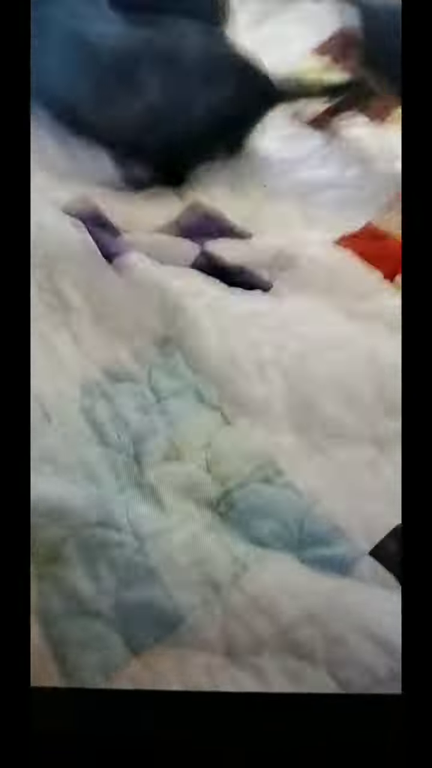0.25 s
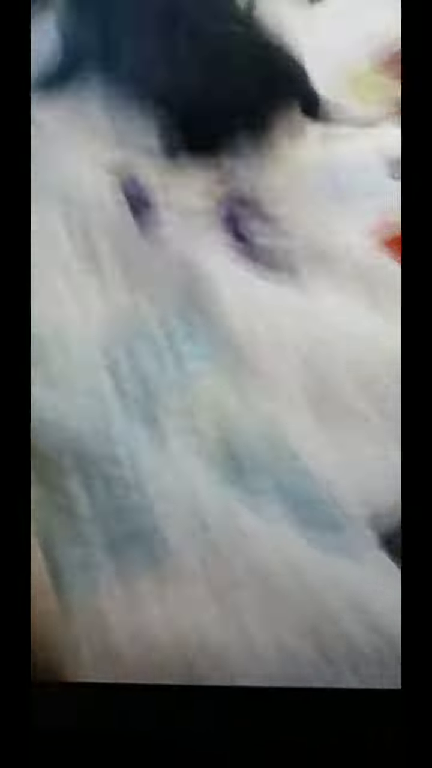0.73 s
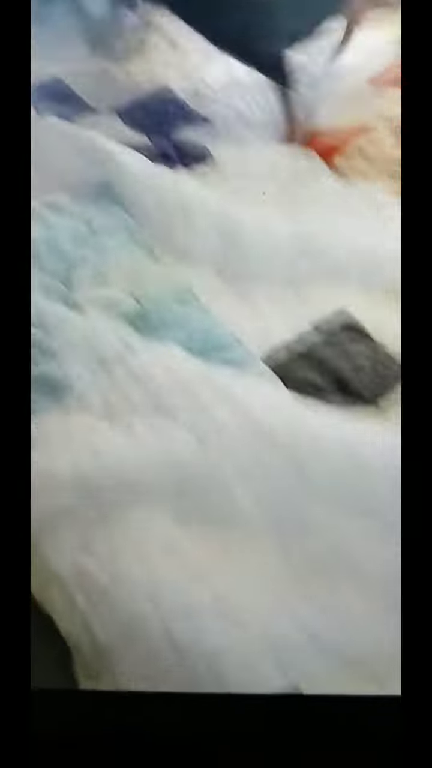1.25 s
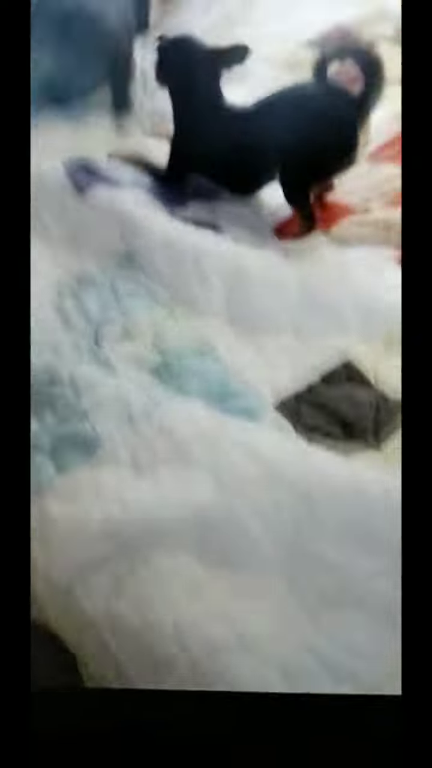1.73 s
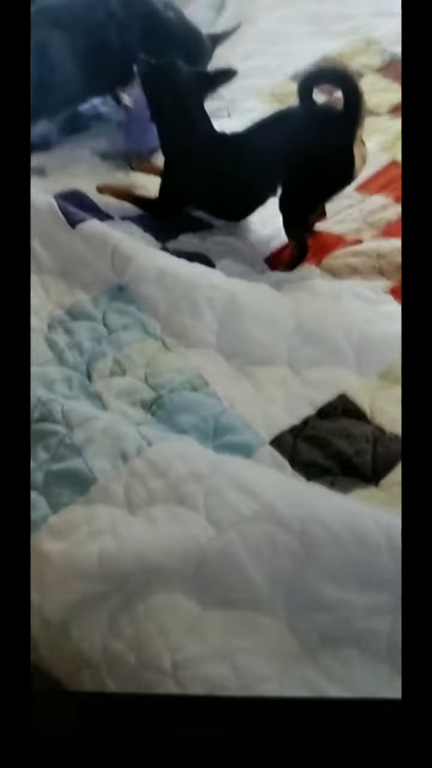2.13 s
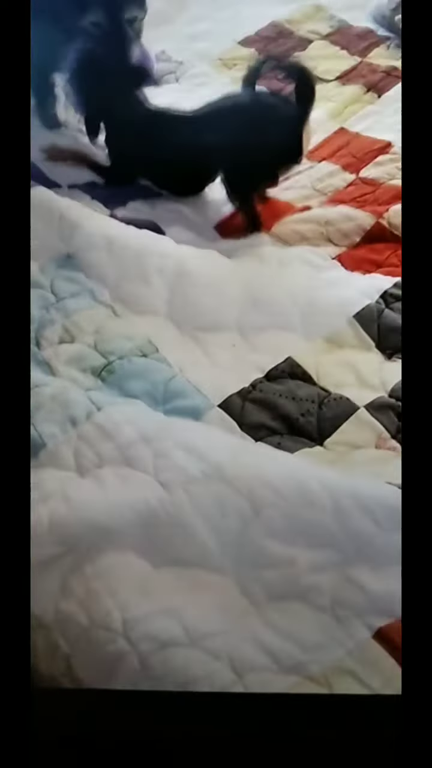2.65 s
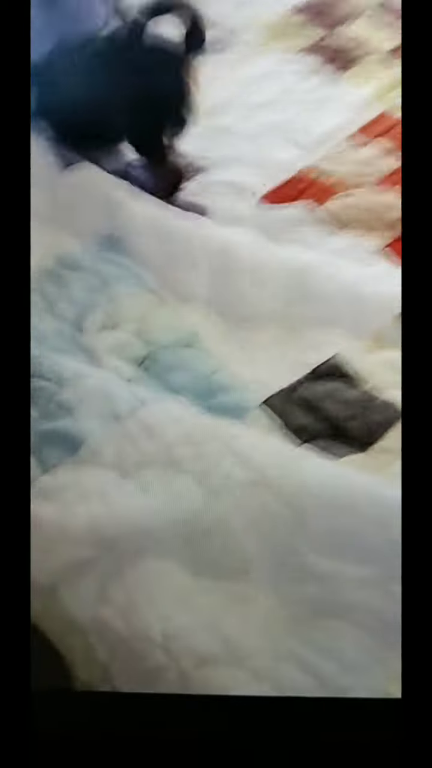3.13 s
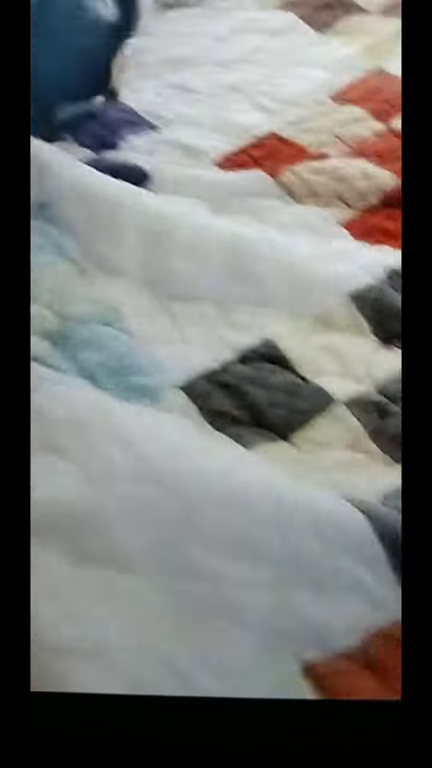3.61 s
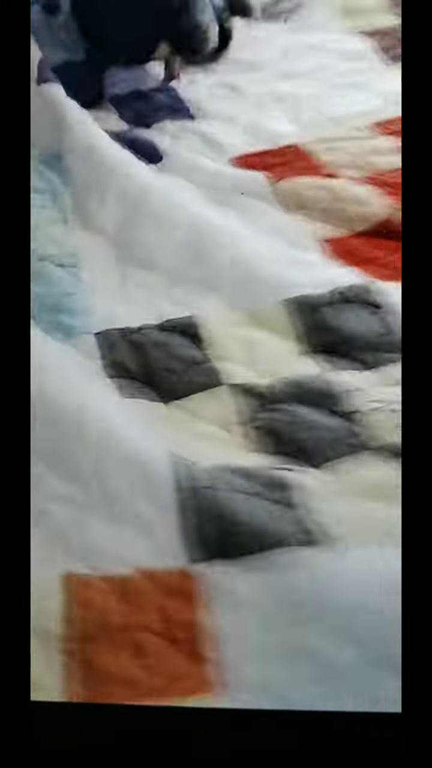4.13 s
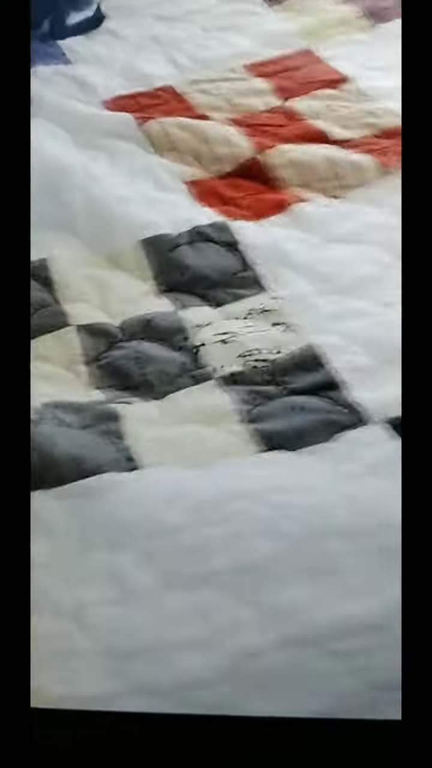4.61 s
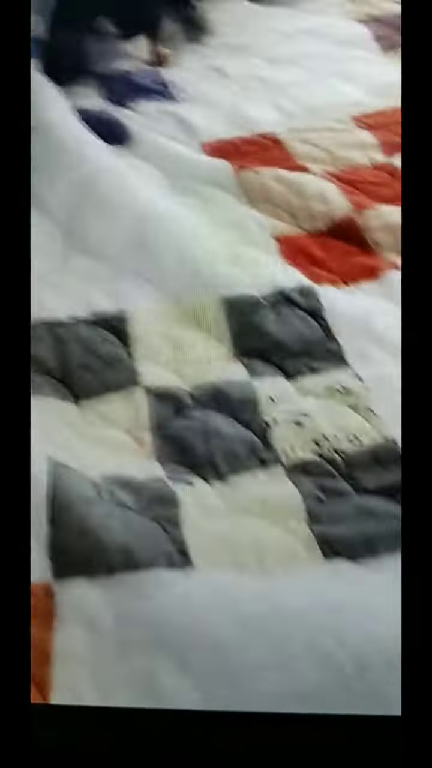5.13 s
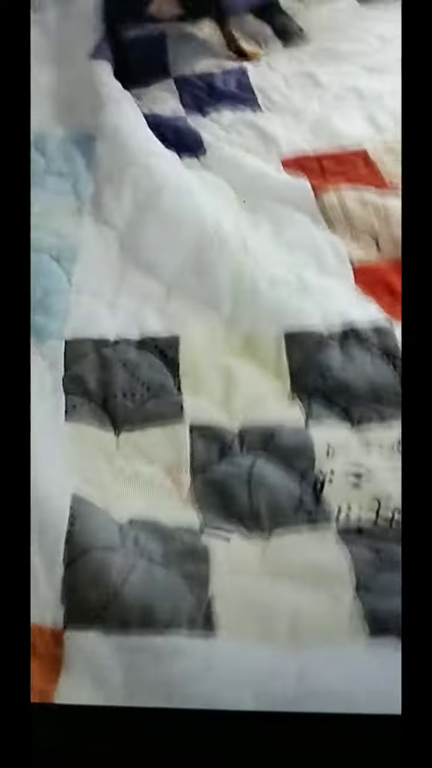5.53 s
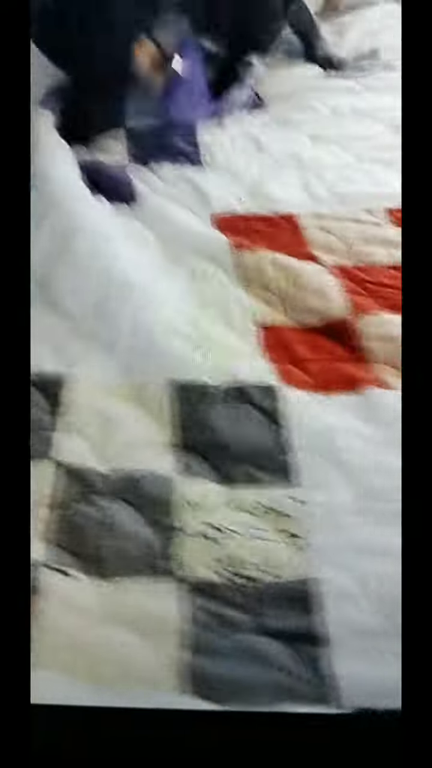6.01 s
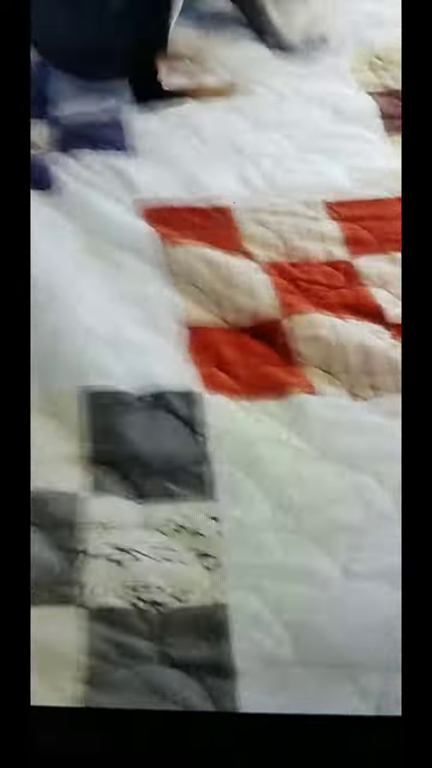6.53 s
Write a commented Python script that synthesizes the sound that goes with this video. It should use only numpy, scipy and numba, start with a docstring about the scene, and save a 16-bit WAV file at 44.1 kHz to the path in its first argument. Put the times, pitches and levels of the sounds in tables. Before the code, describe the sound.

Close, thin, small-speaker sound of wrestling puppies: gravelly, uneven growls and breathy snorts, strongest just after the first second. Very short, high, falling toy squeaks repeat irregularly from about one and a half to five and a half seconds. Three bright yaps burst out around the middle, with whining and a low moan after. It drops to a faint hush, then a softer growl returns. Soft indoor room, gated tails.

```python
"""Growling puppies wrestle on a bed: uneven vocal-fold pulses and puffing air excite body resonances.
They also yap three times, whine and moan (wavering harmonic series), and their teeth click.
They bite a squeaky toy again and again: a pop, then a rattling reed whose pitch sags.
All this comes through a small loudspeaker in a soft room and reaches two microphone ports by unequal
paths; a noise gate shortens the tails, and a faint background lies underneath."""
import sys
import numpy as np
from scipy import signal
from scipy.fft import rfft, irfft, next_fast_len
from scipy.io import wavfile
from scipy.ndimage import uniform_filter1d
from numba import njit

SR = 44100
rng = np.random.default_rng(int(sys.argv[2]) if len(sys.argv) > 2 else 0)


def transcribe(signal):
    """Save signal, clipped to [-1, 1], as a 16-bit WAV file at the path in sys.argv[1]."""
    frames = np.atleast_2d(signal).T
    limited = np.clip(frames, -1, 1)
    pcm = np.round(limited * 32767).astype(np.int16)
    wavfile.write(sys.argv[1], SR, pcm)


N = 298116

# yaps, nearly clean fold vibration: pitch_spread (relative), cycle_alternation (0-1),
# [(time_s, pitch_hz, fundamental_db, overtones_db, strongest_overtone_hz)]
YAP_CALLS = [(.004, 0.23, [(3.695, 814, -28.5, -51, 2200), (3.706, 925.6, -23.5, -39, 2200),
             (3.727, 1063, -13.5, -35, 2300), (3.745, 1071, -15, -23.5, 2400),
             (3.76, 1111, -22.5, -20.5, 3000), (3.782, 1150, -15.5, -25, 3500),
             (3.796, 1128, -25, -22.5, 3500), (3.806, 1031, -44, -22, 2900),
             (3.826, 973, -25.5, -28.5, 2300), (3.842, 963.4, -26, -34.5, 2100),
             (3.865, 1088, -20, -42, 2300), (3.89, 1049, -39, -44, 2200), (3.93, 1124, -25, -42, 3000)]),
             (0.0081, 0.15, [(4.345, 959, -50.5, -63, 2600), (4.362, 1011, -27, -53, 2400),
             (4.378, 1081, -15, -33.5, 2600), (4.39, 1114, -13.5, -24, 3300),
             (4.42, 1084, -21.5, -30.5, 3400), (4.44, 1104, -41.5, -49.5, 3600),
             (4.495, 1055, -33, -27.5, 3200)]), (0.0043, 0.26, [(4.505, 906, -48.5, -27.5, 1800),
             (4.55, 893.5, -36, -34.5, 1800), (4.59, 899.4, -30, -37.5, 1850),
             (4.612, 924, -32.5, -28.5, 2100), (4.624, 961, -12.5, -21, 2300),
             (4.65, 985.5, -27.5, -28, 2164), (4.67, 942, -25, -28.5, 2095),
             (4.686, 885, -29.5, -42.5, 1850), (4.71, 873.7, -24, -46.5, 1800),
             (4.742, 972, -25.5, -36.5, 1850), (4.79, 971, -27, -48, 1850), (4.83, 883, -48, -70.5, 1850)])]


def growl(throat_width_hz, direct_rasp_db, yap_duck_db):
    """Source and filter: fold pulses and pulsed air drive parallel resonances of chest, throat and mouth."""
    # phrases: chest_db (while the throat is at middling_db), [(time_s, throat_db)]
    growl_phrases = [ (-64.5, [(0.264, -50), (0.272, -64), (0.468, -65), (0.482, -55)]),
                     (-54, [(0.484, -38), (0.524, -37), (0.68, -53)]), (-60, [(0.7, -88), (0.85, -63)]),
                     (-65.5, [(0.96, -51.5), (0.98, -34.5), (1.19, -32), (1.21, -28.5), (1.274, -24.5),
                     (1.53, -36.5), (1.62, -111)]), (-63.5, [(1.63, -46), (1.676, -33.5), (1.774, -33),
                     (1.986, -47.5), (2.036, -99.5)]), (-54.5, [(2.335, -84.5), (2.359, -45.5),
                     (2.627, -51), (3.15, -44.5), (3.163, -36.5), (3.261, -48.5), (3.289, -34),
                     (3.345, -48.5), (3.42, -79.5)]), (-73, [(3.43, -49), (3.696, -42), (3.732, -18),
                     (3.8, -61), (3.828, -19.5), (3.864, -26), (3.894, -48), (4.036, -73)]),
                     (-66.5, [(4.345, -61.5), (4.361, -8), (4.383, -12), (4.479, -43), (4.623, -10),
                     (4.673, -40), (4.825, -40), (5.319, -57.5), (5.42, -100)]), (-59, [(6.06, -99),
                     (6.096, -57.5), (6.148, -38), (6.496, -63), (6.52, -55.5), (6.76, -49.5)]), ]
    # air through open jaws: mouth_db (against the breath), [(time_s, breath_db)]
    pant_phrases = [ (-16.5, [(0.06, -69.5), (0.12, -50.5), (0.26, -68)]), (-4, [(0.262, -58), (0.366, -43),
                    (0.468, -57), (0.514, -48), (0.95, -55.5), (0.98, -45.5), (1.03, -41.5), (1.158, -44.5),
                    (1.284, -29), (1.525, -39.5)]), (-16, [(1.63, -33.5), (1.88, -32.5), (1.95, -50)]),
                    (-12, [(2.52, -54.5), (2.66, -64), (2.672, -55.5), (2.72, -57), (2.888, -58.5),
                    (2.95, -49.5)]), (-7, [(2.99, -63), (3.13, -47.5), (3.17, -45.5), (3.304, -42),
                    (3.484, -70.5), (3.545, -50.5)]), (4.5, [(3.63, -58), (3.705, -39.5), (3.725, -27),
                    (3.746, -32), (3.798, -47), (3.94, -57.5)]), (9.5, [(4.05, -63.5), (4.156, -87),
                    (4.18, -80)]), (2, [(4.345, -44), (4.391, -31), (4.6, -45.5), (4.622, -30.5),
                    (4.88, -68)]), (-20.5, [(5.03, -50.5), (5.12, -71.5)]), (-9, [(6.04, -88.5),
                    (6.08, -43.5), (6.166, -37.5), (6.256, -54), (6.294, -43.5), (6.45, -53.5),
                    (6.76, -46)]), ]
    # colour of the rasp: time_s, mouth_relative_db, lips_relative_db
    rasp_colour = [(.1, 6.5, 19.5), (.4, 1.5, 0), (.95, 1, 2), (1.02, 7, 0), (1.1, 2.5, 10),
                   (1.19, 3, -5.5), (1.3, -9, -2), (1.45, -6.5, -14.5), (1.68, -8.5, 4), (1.85, 4, 8.5),
                   (2.6, -7, -23.5), (2.8, 10.5, 13), (3.2, 0.5, -4.5), (3.4, 1, 1), (3.75, 1.5, -1),
                   (3.9, 7, 9.5), (4.4, -2.5, -7), (4.55, -5.5, -5), (4.7, -6, -14), (5.1, 16.5, 6),
                   (6.15, 0.5, -0.5), (6.4, 8, 9.5), (6.76, 6, 2.5)]
    # spectral envelopes: frequency_hz, relative_db
    chest_spectrum = [(60, -48), (120, -12), (245, -12.5), (380, -7.5), (550, -6.5), (700, 5.5), (900, -42)]
    throat_spectrum = [(400, -49.5), (650, -11), (900, 2), (1200, -5), (1500, -12), (1900, -40)]
    # resonances of mouth, lips (upper rasp) and breath: centre_hz, width_hz, relative_db
    mouth_modes = [(1910, 560, -6), (2810, 470, -3), (2857, 502, -2.5)]
    lip_modes = [(4500, 570, -7), (5255, 380, -1), (6300, 1000, -12.5)]
    breath_modes = [(7415, 910, -1.5), (8850, 1100, -0.5), (9640, 3000, -5), (11390, 350, -4.5),
                    (12180, 500, 2), (14500, 1500, -0.5)]

    middling_db = -45
    chest_follows, mouth_follows = 0.81, 0.44   # dB gained for each dB of the throat
    throat_gain, chest_gain = phrases([
        [(s, db, chest_db + chest_follows * (db - middling_db)) for s, db in rows]
        for chest_db, rows in growl_phrases])
    mouth_gain, breath_gain = phrases([
        [(s, db + mouth_db, db) for s, db in rows] for mouth_db, rows in pant_phrases])
    mouth_gain = mouth_gain * (throat_gain / from_db(middling_db) + 0.32) ** mouth_follows

    # the rasp gives way while the folds sing a yap
    ducking = yap_ducking(yap_duck_db)
    throat_gain, chest_gain = throat_gain * ducking, chest_gain * ducking
    mouth_gain = mouth_gain * ducking ** .55

    source, breath_air, throat_hz, jaw_hz = fold_source()
    throat_turn = 2 * np.pi * throat_hz * (1 + 0.08 * wander(.02)) / SR
    throat = moving_resonance(source, throat_turn, pole_radius(throat_width_hz))
    throat = throat + from_db(direct_rasp_db) * source

    jaw_turn, jaw_radius = 2 * np.pi * jaw_hz / SR, pole_radius(420)
    vowel = moving_resonance(source, jaw_turn, jaw_radius)
    vowel = moving_resonance(vowel, jaw_turn, jaw_radius)
    voiced_air = source + breath_air
    mouth = from_db(-5.0) * vowel + resonances(voiced_air, mouth_modes, patchy_db=3.0)
    lips = resonances(voiced_air, lip_modes, patchy_db=6.0)
    breath = resonances(breath_air, breath_modes, patchy_db=6.0)
    mouth_db, lips_db = in_time(rasp_colour)
    return (throat_gain * evened(coloured(throat, throat_spectrum))
            + chest_gain * evened(coloured(source, chest_spectrum))
            + mouth_gain * from_db(mouth_db - 6.0) * evened(mouth)
            + mouth_gain * from_db(lips_db - 5.0) * evened(lips)
            + breath_gain * evened(breath))


def fold_source():
    """Glottal excitation: jittered pulses of alternating strength, and turbulence peaking once a cycle."""
    # folds and tract: time_s, pulses_per_s (mean), roughness (0-1), throat_hz, second_resonance_hz
    fold_settings = [(.26, 200, .7, 950, 2160), (.5, 110, .55, 1060, 2050), (.7, 320, .5, 960, 2150),
                     (.93, 385, .5, 900, 2200), (1.0, 125, .45, 970, 2300), (1.2, 125, .5, 980, 1900),
                     (1.29, 140, .6, 1250, 2560), (1.45, 100, .5, 980, 2300), (1.95, 110, .5, 950, 2300),
                     (2.35, 245, .35, 1000, 2250), (2.8, 248, .36, 960, 2150), (3.1, 245, .35, 980, 2150),
                     (3.16, 430, .5, 1090, 2150), (3.29, 420, .5, 920, 2160), (3.32, 245, .35, 880, 2160),
                     (3.65, 250, .5, 870, 2170), (3.73, 260, .7, 1090, 2170), (3.8, 250, .7, 1050, 2100),
                     (3.828, 240, .7, 830, 2050), (3.93, 240, .7, 960, 2050), (4.4, 215, .7, 1100, 2005),
                     (4.6, 200, .6, 930, 1980), (5.3, 203, .45, 940, 1900), (6.1, 135, .45, 1000, 2100),
                     (6.28, 210, .4, 960, 2550), (6.45, 195, .3, 900, 2240), (6.76, 220, .3, 950, 2150)]
    rate, rough, throat_hz, jaw_hz = in_time(fold_settings)
    jitter = .12 * rough * wander(.006) + .05 * wander(.05)
    cycles = np.cumsum(rate * (1 + jitter) / SR)
    closing = np.diff(np.floor(cycles), prepend=0)   # one wherever a cycle begins
    pulses = closing * np.sqrt(SR / rate) * from_db(7.0 * rough * wander(0.0021))
    pulses = pulses * (1 + .22 * (-1) ** np.floor(cycles))   # strong and weak take turns

    puffs = .5 + np.cos(np.pi * cycles) ** 2
    unsteady_db = np.array([[3.9], [1.5]]) * wander(0.013)   # fold air, breath air
    fold_air, breath_air = rng.standard_normal((2, N)) * puffs * from_db(unsteady_db)

    throb = from_db(3.0 * np.minimum(wander(0.0071), 1.7))   # uneven clumps
    source = throb * ((1 - rough) * pulses + rough * fold_air)
    return source, breath_air, throat_hz, jaw_hz


def yap_ducking(depth_db):
    """Change of phonation: a gain that dips while the folds vibrate cleanly in a yap."""
    gain = np.ones(N)
    for *_, rows in YAP_CALLS:
        corners_s = [rows[0][0], rows[1][0], rows[-2][0], rows[-1][0]]
        gain = gain * from_db(np.interp(np.arange(N) / SR, corners_s, [0, depth_db, depth_db, 0]))
    return gain


def yelps():
    """Nearly periodic fold vibration: harmonic yaps, and thin whines with fewer partials."""
    # whines: pitch_spread (relative), cycle_alternation (0-1),
    # [(time_s, pitch_hz, fundamental_db, overtones_db, strongest_overtone_hz)]
    whine_calls = [(0.0077, .05, [(4.412, 1820, -47, -37, 4340), (4.424, 1798, -26, -38.5, 3956),
                   (4.448, 1815, -29, -28, 3980), (4.462, 1532, -44, -27, 4360),
                   (4.472, 1452, -25, -36, 4270), (4.5, 1302, -41, -66, 4300)]),
                   (0.004, .05, [(6.545, 2360, -56, -74, 5160), (6.575, 2390, -46.5, -77, 5200),
                   (6.6, 2390, -63, -75, 5200)])]
    yaps = sung(YAP_CALLS, flutter_db=2.0, count=5, fall_db=23.0)
    return yaps + sung(whine_calls, flutter_db=4, count=3, fall_db=16)


def moans():
    """Harmonic voicing under the growl: low pitches glide in straight lines."""
    # start_s, end_s, start_pitch_hz, end_pitch_hz, start_db, end_db, strongest_overtone_hz,
    # fundamental_db (against start_db and end_db)
    glides = [(0.641, 0.938, 316.3, 382, -56, -52.5, 695, -9.5),
              (0.943, 1.028, 442, 530, -45, -50.5, 910, -3), (1.009, 1.26, 496, 504, -37, -27, 956, -23.5),
              (3.151, 3.306, 217.2, 199, -59, -55, 480, -58),
              (3.327, 3.374, 243.6, 231.6, -38.5, -64, 720, -16),
              (3.573, 3.679, 205.7, 271.5, -50, -47, 624, -15),
              (3.677, 3.757, 258, 595, -54, -46.5, 685, -9.5),
              (4.494, 4.601, 400.3, 313.3, -44.5, -48, 735, -11.5),
              (4.752, 5.351, 213.2, 190.4, -55, -70, 477, -26.5),
              (6.191, 6.402, 224.5, 202.8, -46, -65, 640, -43),
              (6.401, 6.781, 195, 211.3, -61, -52, 586, -14.5)]
    calls = []
    for s0, s1, hz0, hz1, db0, db1, best_hz, first_db in glides:
        start = (s0, hz0, db0 + first_db, db0, best_hz)
        end = (s1, hz1, db1 + first_db, db1, best_hz)
        calls.append((.055, 0, [start, end]))
    return sung(calls, flutter_db=6.5, count=3, fall_db=20)


def sung(calls, flutter_db, count, fall_db):
    """Additive harmonic series with a formant: overtones fall by fall_db an octave below the favoured region."""
    steeper_above = 1.1   # above that region they fall this many times faster
    out, t = np.zeros(N), np.arange(N) / SR
    unsteady, flutter = wander(.008), wander(.0035)
    for pitch_spread, alternation, rows in calls:
        start_s, end_s = rows[0][0], rows[-1][0]
        span = slice(int(start_s * SR), int(end_s * SR))
        now = t[span]
        pitch_hz, first_db, over_db, best_hz = (column[span] for column in in_time(rows))
        phase = np.cumsum(2 * np.pi * pitch_hz * (1 + pitch_spread * unsteady[span]) / SR)
        sounding = np.clip(np.minimum(now - start_s, end_s - now) / 0.0081, 0, 1)
        # flutter is strongest around the second row of each call
        ragged_db = flutter_db * (1 + 2 * np.exp(-np.abs(now - rows[1][0]) / 0.026))
        for k in range(1, count + 1):
            octaves = np.log2(k * pitch_hz / best_hz)
            distance = np.maximum(-octaves, steeper_above * octaves)
            db = first_db if k == 1 else over_db - fall_db * distance
            own_flutter = np.minimum(np.roll(flutter, shift=5000 * k)[span], 1)
            partial = from_db(db + ragged_db * own_flutter) * np.sin(k * phase)
            if k > 1:   # strong and weak cycles take turns
                partial = partial * (1 + alternation * np.cos(phase / 2))
            out[span] += sounding * partial
    return out


def toy(click_db, rattle, air_db):
    """Pressure-driven reed: each bite pops, and the pitch sags as pressure falls and air hisses past."""
    # bites: start_s, reed_db, start_pitch_hz, pitch_fall_s, length_s, partial_4_db,
    # pop_db (against the reed), partial_1_db, partial_1_build_up_s
    bites = [(1.533, -29.5, 2960, 0.015, 0.021, 5, -2, -6.5, 0.0021),
             (1.956, -22, 3020, 0.029, 0.027, 3.5, -30, -6.5, 0.0031),
             (2.345, -26.5, 3324, 0.023, 0.024, 7, -9, -4, 0.0023),
             (2.9587, -24.5, 2980, .015, 0.016, 10, 1, -3.5, 0.0035),
             (3.5495, -28, 3267, 0.022, 0.025, 4, 2, -5, 0.009),
             (3.9465, -29, 3025, 0.022, 0.022, 3.5, -4.5, -6, 0.0014),
             (4.111, -54, 3134, 0.018, 0.018, 8.5, -0.5, -6, 0.0056),
             (4.1894, -31, 3164, 0.025, 0.032, 3.5, -1.5, -5, .005),
             (4.884, -29.5, 3260, 0.029, 0.033, 2, 1.5, -9, 0.0061),
             (5.297, -30.5, 3038, 0.025, 0.031, 1.5, 2, -5.5, 0.0032),
             (5.5585, -29, 3046, 0.019, 0.025, 1.5, -4, -4.5, 0.0012)]
    # one level_db for each of partials 2, 3 and 5
    reed_partials_db = [-3, 1, -5.5]
    end_hz, rise_s, sag_power = 2400, .0025, 1.3
    out = np.zeros(N)
    unsteady = wander(0.0011)
    highpass = signal.butter(2, 900, "high", fs=SR, output="sos")
    air = signal.sosfilt(highpass, rng.standard_normal(N))
    for s, reed_db, start_hz, fall_s, length_s, fourth_db, pop_db, first_db, body_s in bites:
        partials_db = first_db, *reed_partials_db[:2], fourth_db, reed_partials_db[2]
        at, t = round(s * SR), np.arange(int(length_s * SR)) / SR
        span = slice(at, at + len(t))
        shaken = unsteady[span]
        sag = np.cos(np.pi / 2 * np.minimum(t / fall_s, 1)) ** (2 * sag_power)
        pitch_hz = end_hz + (start_hz - end_hz) * sag
        phase = np.cumsum(2 * np.pi * pitch_hz * (1 + .012 * shaken) / SR)
        reed = sum(from_db(db) * np.sin((k + 1) * phase) for k, db in enumerate(partials_db))
        # partial 1 builds up late
        reed -= from_db(first_db) * np.sin(phase) * np.exp(-(t / body_s) ** 2)
        swell = np.minimum(t / rise_s, 1) * np.cos(np.pi / 2 * (t / length_s) ** 1.82)
        pop_shape = np.sin(np.pi * np.minimum(t / .0016, 1)) ** 2
        pop = from_db(click_db) * np.sin(2 * np.pi * 1500 * t) * pop_shape
        hiss = from_db(air_db) * air[span] * np.exp(-t / 0.0018)
        squeak = reed * swell * (1 + rattle * shaken) + from_db(pop_db) * (pop + hiss)
        out[span] += from_db(reed_db) * squeak
    return out


def teeth():
    """Impulse response of a band-pass: teeth meet in short dry clicks."""
    # time_s, impulse_db (before the band-pass)
    meetings = [(4.623, -6), (6.2942, -9)]
    clicks = np.full(N, 1e-18)
    for s, impulse_db in meetings:
        clicks[round(s * SR)] = from_db(impulse_db)
    return signal.sosfilt(signal.butter(2, [1300, 7000], "band", fs=SR, output="sos"), clicks)


def loudspeaker(x):
    """Linear filtering: an uneven treble response, and a high-pass because a small speaker has no bass."""
    # frequency_hz, response_db
    response = [(3000, -1), (3750, -0.5), (4400, 2.5), (6200, -3), (6850, -7.5), (7400, 0), (8600, 1),
                (9600, 2.5), (10700, -2), (11250, -1.5), (11600, 4.5), (12000, 1), (12600, 2.5),
                (13500, -6)]
    highpass = signal.butter(4, 230, "high", fs=SR, output="sos")
    return signal.sosfilt(highpass, coloured(x, response))


def room_and_ports(x):
    """Reverberation by convolution with decaying noise; level and phase differences part the two ports."""
    # left port against right port: frequency_hz, louder_db, ahead_rad
    port_differences = [(60, 0, 0), (450, 11, 0), (600, 3, -1.1), (950, -7, 0), (1400, -2, 1),
                        (1750, 8, 3.1), (2100, 1, 6.2), (4000, 0, 6.5), (5100, 6, 8.6), (5700, 1, 12.4),
                        (7000, 1, 12.6), (7900, 8, 12.9), (8800, -8, 9.4), (9900, -12, 7.3),
                        (10400, -5, 3.6), (10900, 4, 2), (11600, -18, .3), (11900, -8, -3),
                        (12500, 0, -3.1)]
    t60_s, shared_tail_db, own_tail_db = 0.23, 0.5, -10.   # own tails: against the shared one
    treble_db = -1   # the bedding swallows some treble before it reaches the walls
    t = np.arange(SR // 2) / SR
    tails = rng.standard_normal((3, len(t))) * from_db(-60 * t / t60_s) * np.minimum(t / 0.0049, 1)
    tails /= np.sqrt(np.sum(tails ** 2, axis=1, keepdims=True))
    size = next_fast_len(N + SR)
    shared, *own = rfft(tails, size)
    grid_hz = np.fft.rfftfreq(size, 1 / SR)
    # the treble loss grows from 1.5 kHz to 6 kHz
    wet_db = shared_tail_db + treble_db * np.clip(np.log2(grid_hz / 1500 + 1e-9), 0, 2) / 2
    paths = 1 + from_db(wet_db) * (shared + from_db(own_tail_db) * np.array(own))
    hz, louder_db, ahead_rad = np.transpose(port_differences)
    # each port takes half the difference, in opposite directions
    half_gain = from_db(np.interp(grid_hz, hz, louder_db) / 2)
    half = half_gain * np.exp(.5j * np.interp(grid_hz, hz, ahead_rad))
    return irfft(rfft(x, size) * paths * np.array([half, 1 / half]), size)[:, :N]


def gated(x):
    """Downward expansion: a noise gate lowers what falls under its threshold, so tails end early."""
    threshold_db, slope = -57.5, 0.78   # slope: dB of cut for each dB under the threshold
    power = uniform_filter1d(np.mean(x ** 2, axis=0), size=900)
    level_db = 10 * np.log10(power + 1e-14)
    return x * from_db(slope * np.minimum(level_db - threshold_db, 0))


def background():
    """Coloured, partly correlated stereo noise whose level wanders."""
    # frequency_hz, relative_density_db
    hush_spectrum = [(20, -13.5), (47, -1.5), (70, -2.5), (118, -8.5), (139, -11), (470, -12), (638, -19.5),
                     (12000, -25.5), (15000, -41.5)]
    rms_db = -78.5
    noise = rng.standard_normal((2, N)) + .5 * rng.standard_normal(N)
    hush = coloured(noise, hush_spectrum) * from_db(4 * wander(0.072))
    return from_db(rms_db) * hush / hush.std()


def phrases(tables):
    """Amplitude envelopes: level columns in dB become gains, with fades at the ends of each phrase."""
    t, out = np.arange(N) / SR, 0
    for rows in tables:
        rise = (t - rows[0][0]) / 0.0034
        release = (rows[-1][0] - t) / 0.18 + 1   # fades after the last row
        sounding = np.clip(np.minimum(rise, release), 0, 1)
        out = out + sounding * from_db(in_time(rows))
    return out


def resonances(x, modes, patchy_db):
    """Parallel two-pole resonances, each passed twice to keep valleys dark and swelling as the jaws move."""
    out, jaws = 0, wander(0.024)
    for k, (hz, width_hz, level_db) in enumerate(modes):
        r = pole_radius(width_hz)
        section = [(1 - r * r) / 2, 0, (r * r - 1) / 2, 1, -2 * r * np.cos(2 * np.pi * hz / SR), r * r]
        gain = from_db(level_db + patchy_db * np.roll(jaws, shift=9000 * k))
        out = out + (-1) ** k * gain * signal.sosfilt([section, section], x)
    return out


@njit
def moving_resonance(x, turn, r):
    """Time-varying two-pole resonance: turn is its centre in radians per sample, r its pole radius."""
    y = np.zeros(len(x))
    for i in range(2, len(x)):
        drive = (1 - r * r) / 2 * (x[i] - x[i - 2])
        y[i] = drive + 2 * r * np.cos(turn[i]) * y[i - 1] - r * r * y[i - 2]
    return y


def pole_radius(width_hz):
    """Damping: the wider a resonance, the faster it decays and the smaller its pole radius."""
    return np.exp(-np.pi * width_hz / SR)


def coloured(x, spectrum):
    """Spectral shaping: a (Hz, dB) table, joined along log frequency, weights the Fourier spectrum."""
    hz = np.fft.rfftfreq(N, 1 / SR) + 1
    table_hz, table_db = np.transpose(spectrum)
    gain = from_db(np.interp(np.log(hz), np.log(table_hz), table_db))
    return irfft(rfft(x) * gain, N)


def evened(x):
    """Level normalisation: division by the running rms over about 60 ms."""
    return x / np.sqrt(uniform_filter1d(x ** 2, size=2600) + 1e-12)


def wander(seconds):
    """Low-pass random process: noise averaged twice over the given time, scaled to spread 1."""
    slow = uniform_filter1d(rng.standard_normal(N), size=int(seconds * SR))
    slow = uniform_filter1d(slow, size=int(seconds * SR))
    return slow / slow.std()


def in_time(rows):
    """Linear interpolation: the columns of a table at every sample."""
    s, *columns = np.transpose(rows)
    return [np.interp(np.arange(N) / SR, s, c) for c in columns]


def from_db(db):
    """Logarithmic level: decibels to amplitude gain."""
    return 10 ** (np.asarray(db) / 20)


def scene():
    """Superposition: puppies and toy pass speaker, room and gate in series; the background is added."""
    voices = growl(throat_width_hz=170, direct_rasp_db=-12, yap_duck_db=-15) + yelps() + moans()
    played = voices + teeth() + toy(click_db=-2.5, rattle=0.35, air_db=-3.5)
    return gated(room_and_ports(loudspeaker(played))) + background()


def record(dry):
    """Band limiting: a steep low-pass cuts the top above about 16 kHz."""
    return signal.sosfilt(signal.cheby2(18, 70, 16200, fs=SR, output="sos"), dry)


dry = scene()
out = record(dry)
transcribe(out)
```